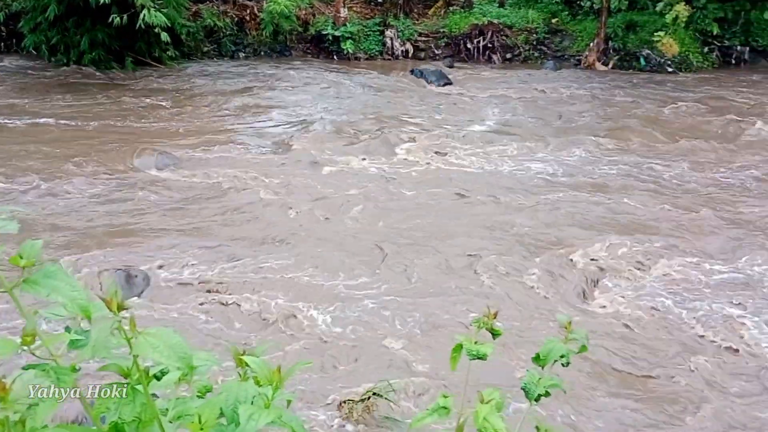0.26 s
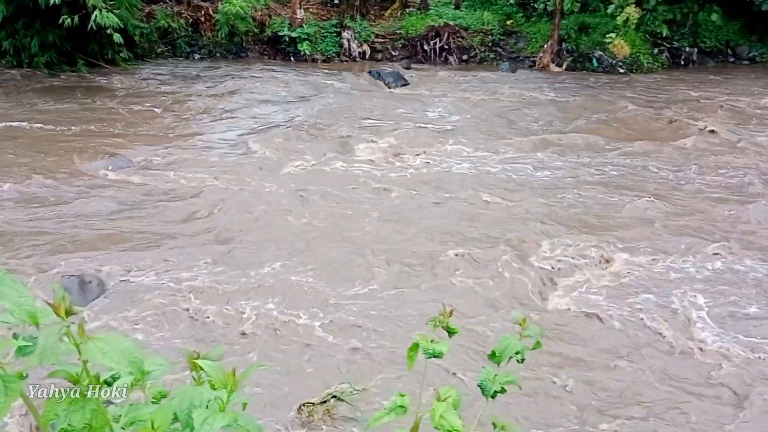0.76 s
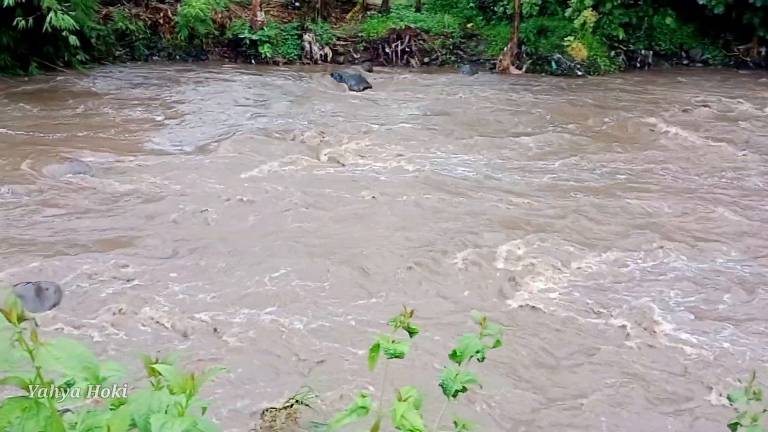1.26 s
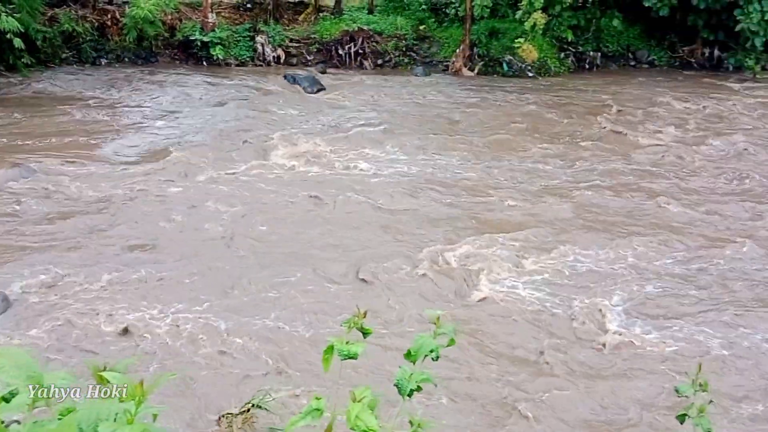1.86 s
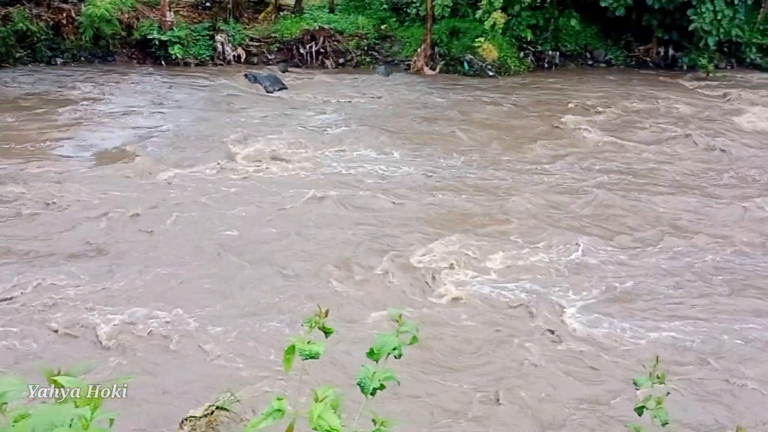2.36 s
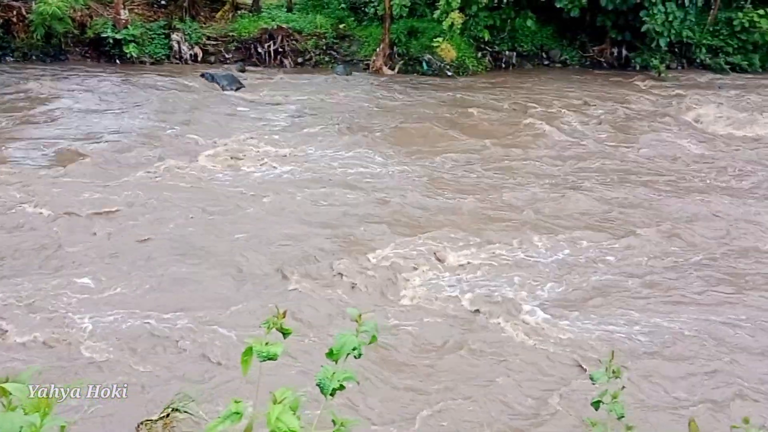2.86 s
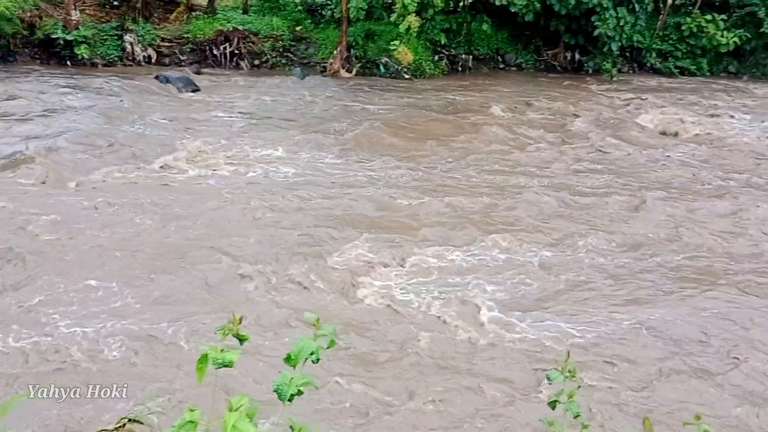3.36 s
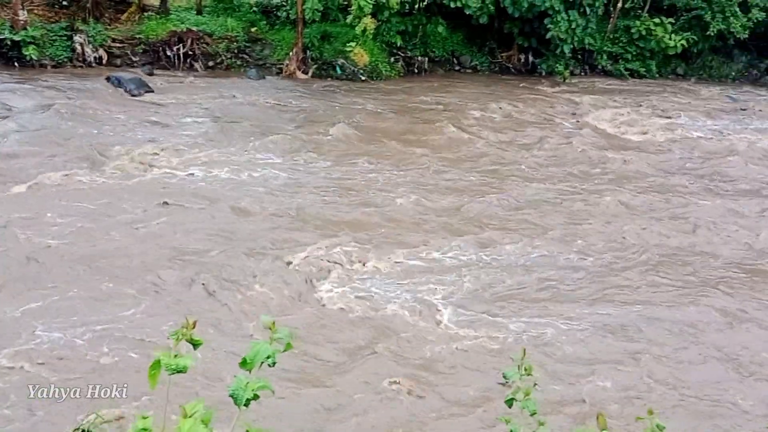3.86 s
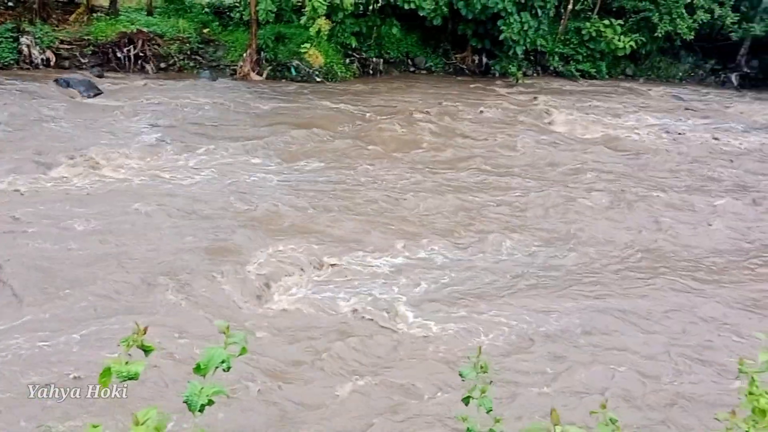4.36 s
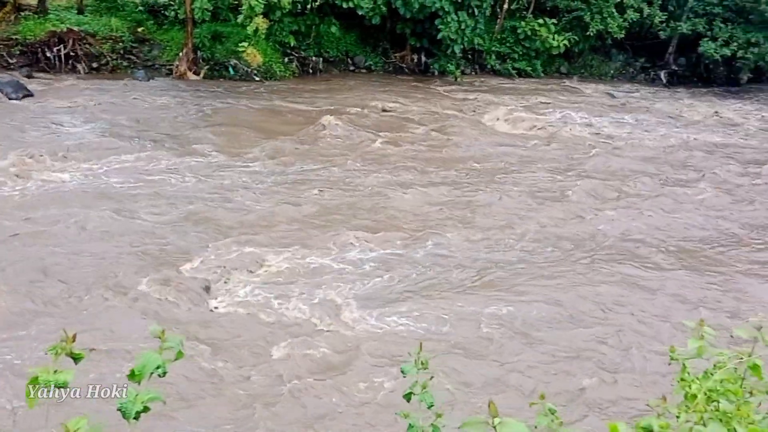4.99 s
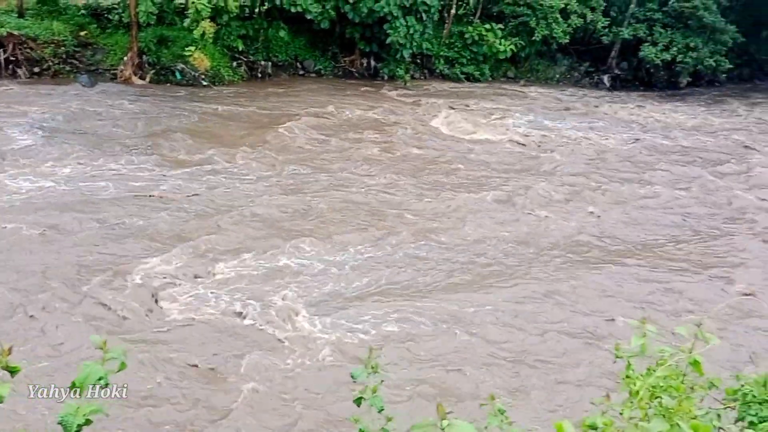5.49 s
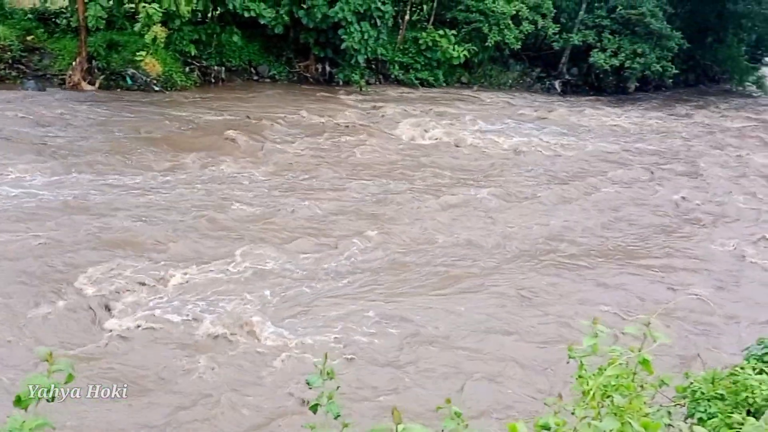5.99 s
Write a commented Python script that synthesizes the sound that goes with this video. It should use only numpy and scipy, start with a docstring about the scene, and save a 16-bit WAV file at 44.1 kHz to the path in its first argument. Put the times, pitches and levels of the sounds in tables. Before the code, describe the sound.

A muddy flooded river rushes past in a steady, dense roar, with fine spray hiss on top and low, lumpy thuds of collapsing waves.

```python
"""Flooded river over rocks

A steady roar of merged bubbles carries spray hiss on top, and standing waves collapse with low thuds.
Dense water is noise of shaped spectrum; nearer bubbles are decaying sinusoids of slightly rising pitch.
Low layers swell and sag at listed times; soft thumps are probably wind puffs, a whine perhaps insects.
A small handheld microphone, with two ports probably summed out of phase, cancels a band near 5 kHz."""
import sys
import numpy as np
from scipy import signal
from scipy.io import wavfile
from scipy.ndimage import uniform_filter1d

SR = 44100
rng = np.random.default_rng(int(sys.argv[2]) if len(sys.argv) > 2 else 0)


def wav_out(sig):
    """Save sig, one row per channel (or a flat mono array), as 16-bit PCM at SR to the path in sys.argv[1]."""
    wavfile.write(sys.argv[1], SR, np.round(np.clip(np.atleast_2d(sig).T, -1, 1) * 32767).astype(np.int16))


N = 274743  # samples

# Relative spectra; each finished layer is scaled to its own level. Columns: f/Hz, level/dB (per Hz)
# Deep rumble, probably puffs of wind at the microphone: f/Hz, level/dB (per Hz)
RUMBLE_SPECTRUM = [(20, -45), (45, -30), (70, -1), (90, -2), (160, -1), (200, -3), (300, -36), (550, -100)]
# Fine spray: f/Hz, level/dB (per Hz)
SPRAY_SPECTRUM = [(1200, -90), (2500, -47), (3500, -12.5), (7600, 1.5), (8730, -0.5), (9340, -7.5),
                  (10000, -4), (11000, -8), (11500, -10), (12200, -7), (13300, -8), (13800, -12),
                  (14800, -9)]
# Smaller air pockets: f/Hz, level/dB (per Hz)
SLOSH_SPECTRUM = [(120, -90), (240, -31), (310, -4.5), (350, 2), (430, -6), (500, -3), (620, -37),
                  (1100, -100)]
# Big air pockets under collapsing waves: f/Hz, level/dB (per Hz)
CHURN_SPECTRUM = [(40, -90), (100, -31), (170, -11), (237, 2.5), (310, 2.5), (350, -15.5), (450, -45),
                  (800, -100)]
# White water: f/Hz, level/dB (per Hz)
ROAR_SPECTRUM = [(250, -78), (430, -20.5), (520, -2.5), (600, 0.5), (770, -0.5), (1310, -3), (2050, -9),
                 (2490, -13), (3400, -14.5), (4420, -26), (7480, -110)]

# Slowly changing roar. Columns: t/s, level/dB
ROAR_SWELL = [(0, -29), (1.2, -29), (1.42, -30), (1.6, -29.2), (2.1, -30), (3.65, -30), (3.75, -28),
              (3.8, -30), (3.95, -29), (4.9, -29), (5.1, -30), (5.2, -29), (6.0, -29.5), (6.23, -28.5)]
# Standing waves that collapse with a thud. Columns: start t/s, length t/s, level/dB
COLLAPSES = [(0.224, 0.026, -38), (0.61, 0.15, -44), (1.005, 0.15, -35), (1.19, 0.031, -36),
             (1.345, 0.073, -37), (1.48, 0.028, -36), (2.055, 0.16, -32.5), (2.268, 0.066, -36.5),
             (2.545, 0.13, -42.5), (2.767, 0.074, -38), (3.297, 0.071, -35), (3.72, 0.032, -32.5),
             (4.042, 0.029, -35), (4.12, 0.056, -38.5), (4.461, 0.047, -38), (4.695, 0.21, -34.5),
             (5.193, 0.1, -36), (5.414, 0.055, -37), (5.64, 0.049, -43), (6.028, 0.126, -35)]
# Deep, soft thumps, probably wind puffs. Columns: start t/s, length t/s, level/dB
THUMPS = [(.13, .06, -46.5), (.25, .05, -49), (.73, .04, -46), (.86, 0.065, -47), (1.25, .14, -42.5),
          (1.74, .04, -50), (1.9, 0.033, -50), (2.29, .07, -45), (2.41, 0.055, -45.5), (2.55, 0.049, -43.5),
          (2.73, 0.028, -45.5), (3.72, .03, -48), (4.13, 0.15, -48), (4.54, 0.045, -48), (4.8, .16, -43.5),
          (5.04, .09, -46), (5.43, 0.073, -47), (5.77, .05, -51), (5.97, 0.036, -47), (6.17, 0.045, -48)]
# Lulls in the low water. Columns: start t/s, length t/s, slosh level change/dB, churn level change/dB
LULLS = [(0.354, 0.19, -6, -1.5), (.82, 0.068, -1.5, -6), (1.355, 0.083, -11, 1.5), (1.697, 0.1, -8, -1.5),
         (2.415, 0.037, -2, -9), (3.021, 0.16, -11, -3), (3.402, .03, 0, -7), (3.55, 0.18, -12, -11),
         (4.0, .16, -7, 0.5), (4.36, 0.049, 1.5, -4), (5.098, .05, -6, -7), (5.363, .04, -5, -6),
         (5.858, 0.059, -7, -4)]
# Gain of the cancelled band at the microphone. Columns: f/Hz, level/dB
CANCELLED_BAND = [(2000, 0), (2500, -1.5), (3300, -1), (3770, -6), (4250, -18.5), (4500, -19.5),
                  (4800, -28.5), (5450, -21.5), (5800, -13), (6200, -9), (6560, -0.5), (7200, 0)]

# All layer levels are those ahead of the microphone
CHURN_DB, SLOSH_DB, RUMBLE_DB = -42.5, -38.5, -52.5  # centre levels, before swells and lulls
SPRAY_DB, WHINE_DB = -44, -56
WHINE_HZ, WHINE_WIDTH_HZ, WHINE_FLUTTER_DB = 4360, 94, 1.8  # the width is that of each of two equal poles
RISE_S, FALL_S = 0.02, 0.022  # ramps of every swell and lull
HEAVE_S = 0.039  # smoothing window of the random lumps of level
ROAR_HEAVE_DB, CHURN_HEAVE_DB, SLOSH_HEAVE_DB, RUMBLE_HEAVE_DB = 0.28, 1.4, 1.2, 2  # RMS
LOW_CUT_HZ, EDGE_HZ = 177, 15490  # limits of the microphone's band
HOP, SIZE = 128, 512  # microphone's spectral frames, in samples
TICKS = np.arange(0, N / SR + 0.002, 0.002)  # clock of the slow controls, t/s


def amp(db):
    """A level of 20 dB is a tenfold amplitude."""
    return 10 ** (np.asarray(db) / 20)


def evened(x):
    """Division by the root mean square brings any signal to unit RMS."""
    return x / np.sqrt(np.mean(x ** 2) + 1e-20)


def read(points, hz):
    """A spectrum is interpolated in dB along a logarithmic frequency axis."""
    f, value = np.transpose(points)
    return np.interp(np.log(hz + 1), np.log(f + 1), value)


def curve(rows):
    """Linear interpolation of (t/s, value) rows yields a value for every sample."""
    return np.interp(np.arange(N) / SR, *np.transpose(rows))


def smoothed_twice(x, span):
    """Two running means in succession suppress rapid variation."""
    return uniform_filter1d(uniform_filter1d(x, span), span)


def heave(depth_db):
    """Smoothed noise used as a level makes the gain wander in random lumps."""
    span = max(1, round(HEAVE_S * SR))
    return amp(depth_db * evened(smoothed_twice(rng.standard_normal(N), span)))


def bump(start, length):
    """A trapezoidal envelope rises from 0 to 1, holds for its length and falls, on the coarse clock."""
    corners = [start - RISE_S, start, start + length, start + length + FALL_S]
    return np.interp(TICKS, corners, [0, 1, 1, 0])


def swelled(rows, steady):
    """Incoherent sounds add in power, so swells add their squared gain to that of the steady layer."""
    power = sum((amp(db) * bump(start, length)) ** 2 for start, length, db in rows)
    return np.sqrt(steady ** 2 + curve(np.transpose([TICKS, power])))


def lulled(db, column):
    """Level changes add in dB: a steady level is shifted, mostly down, during each lull."""
    change_db = sum(row[column] * bump(*row[:2]) for row in LULLS)
    return amp(db + curve(np.transpose([TICKS, change_db])))


def wash(colour, patchy_db, patch_s, patch_hz, flicker_db, size):
    """Sounds too dense to part sum to noise: random spectra with drifting patches and a shared flicker."""
    hop = size // 4
    hz = np.fft.rfftfreq(size, 1 / SR)
    frames = N // hop + 5
    real, imaginary, patches = rng.standard_normal((frames, len(hz), 3)).T
    patches = uniform_filter1d(patches, max(1, round(patch_hz * size / SR)), 0)
    patches = evened(uniform_filter1d(patches, max(1, round(patch_s * SR / hop)), 1))
    flicker = uniform_filter1d(rng.standard_normal(frames), size=4)
    # only the quick part is kept: it averages out in a moment
    flicker = evened(flicker - uniform_filter1d(flicker, size=24))
    level_db = read(colour, hz)[:, None] + patchy_db * patches + flicker_db * flicker
    spectra = (real + 1j * imaginary) * amp(level_db)
    return evened(signal.istft(spectra, nperseg=size, noverlap=size - hop)[1][:N])


def bubbles(colour, lo_hz, hi_hz, per_s, cycles, spread_db, rise, count):
    """A bubble is a damped resonator whose pitch rises as it nears the surface; a few are large."""
    chance, big = rng.random(N), rng.exponential(1, N)
    strikes = amp(spread_db * np.minimum(big, 4)) * (chance < per_s / SR)
    kind, out = rng.integers(0, count, N), np.zeros(N)
    for k, hz in enumerate(np.geomspace(lo_hz, hi_hz, count)):
        turns = np.arange(int(5 * cycles * SR / hz)) * hz / SR  # elapsed cycles
        envelope = (1 - np.exp(-turns / 0.25)) * np.exp(-turns / cycles)
        ring = envelope * np.sin(2 * np.pi * turns * (1 + rise * turns))
        # pitches are spaced by ratio, so each covers a band in proportion to its pitch
        ring *= amp(read(colour, hz)) * np.sqrt(hz) / np.linalg.norm(ring)
        out += signal.oaconvolve(strikes * (kind == k), ring)[:N]
    return evened(out)


def whine():
    """Noise through a sharp resonance is a fuzzy, wavering high tone, perhaps insects in the trees."""
    radius = np.exp(-np.pi * WHINE_WIDTH_HZ / SR)
    turn = np.exp(2j * np.pi * WHINE_HZ * np.arange(N) / SR)
    two_poles = np.convolve([1, -radius], [1, -radius])
    slow = signal.lfilter([1], two_poles, rng.standard_normal(N) / turn)
    flutter = evened(smoothed_twice(rng.standard_normal(N), 3000))
    return amp(WHINE_DB) * evened((turn * slow).real * amp(WHINE_FLUTTER_DB * flutter))


def rumble():
    """Amplitude modulation of low noise gives deep, soft thumps in short lumps, probably wind puffs."""
    gain = swelled(THUMPS, amp(RUMBLE_DB) * heave(RUMBLE_HEAVE_DB))
    return gain * wash(RUMBLE_SPECTRUM, patchy_db=1.5, patch_s=0.06, patch_hz=60, flicker_db=-1.1, size=2048)


def spray():
    """Many fine droplets falling back average to an even hiss that flickers a little."""
    hiss = wash(SPRAY_SPECTRUM, patchy_db=1.3, patch_s=0.02, patch_hz=300, flicker_db=0.6, size=512)
    return amp(SPRAY_DB) * hiss


def slosh():
    """Smaller air pockets resonate a little higher than the churn, with lull depths of their own."""
    lumps = wash(SLOSH_SPECTRUM, patchy_db=2.5, patch_s=0.07, patch_hz=80, flicker_db=1.3, size=1024)
    gurgles = bubbles(SLOSH_SPECTRUM, 320, 495, per_s=150, cycles=3.9, spread_db=4.0, rise=0.0203, count=8)
    gain = lulled(SLOSH_DB, column=2) * heave(SLOSH_HEAVE_DB)
    return gain * evened(lumps + amp(-6.5) * gurgles)


def churn():
    """Big air pockets trapped by collapsing waves resonate low: lumpy noise and dull gulps."""
    lumps = wash(CHURN_SPECTRUM, patchy_db=2.0, patch_s=0.054, patch_hz=90, flicker_db=2.0, size=1024)
    gulps = bubbles(CHURN_SPECTRUM, 171, 343, per_s=65, cycles=4.1, spread_db=4.5, rise=0.0087, count=10)
    gain = swelled(COLLAPSES, lulled(CHURN_DB, column=3) * heave(CHURN_HEAVE_DB))
    return gain * evened(lumps + amp(-6.5) * gulps)


def roar():
    """Superposed bubbles merge into white water: a far wash and nearer, separate rings."""
    far = wash(ROAR_SPECTRUM, patchy_db=2.2, patch_s=0.045, patch_hz=110, flicker_db=0.3, size=1024)
    near = bubbles(ROAR_SPECTRUM, 508, 3003, per_s=2500, cycles=4.7, spread_db=2.0, rise=0.0063, count=36)
    return amp(curve(ROAR_SWELL)) * heave(ROAR_HEAVE_DB) * evened(far + amp(-5.5) * near)


def scene():
    """Sound pressures superpose linearly, so the layers add into one channel."""
    return (whine() + rumble() + spray() + slosh() + churn() + roar())[None]


def record(dry):
    """Two ports probably summed out of phase cancel a band unevenly; a low cut and a band limit follow."""
    hz, _, spectra = signal.stft(dry[0], SR, nperseg=SIZE, noverlap=SIZE - HOP)
    # sound from many directions cancels unevenly, so the depth wavers patch by patch
    ragged = uniform_filter1d(rng.standard_normal(spectra.shape), 2, 0)
    ragged = evened(uniform_filter1d(ragged, 14, 1))
    band_db = read(CANCELLED_BAND, hz)[:, None]
    # tanh confines the wavering to the cancelled band
    spectra = spectra * amp(band_db + 4.1 * ragged * np.tanh(-band_db / 6))
    heard = signal.istft(spectra, SR, nperseg=SIZE, noverlap=SIZE - HOP)[1][None, :N]
    low_cut = signal.butter(1, LOW_CUT_HZ, "high", fs=SR, output="sos")
    heard = signal.sosfilt(low_cut, heard)
    band_limit = signal.firwin(1279, EDGE_HZ, window=("kaiser", 9), fs=SR)
    return signal.oaconvolve(heard, band_limit[None], "same")


dry = scene()
out = record(dry)
wav_out(out)
```